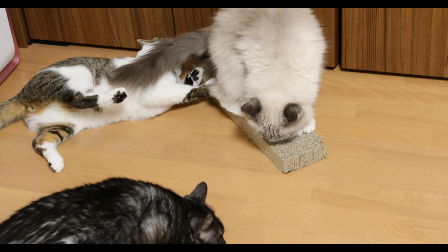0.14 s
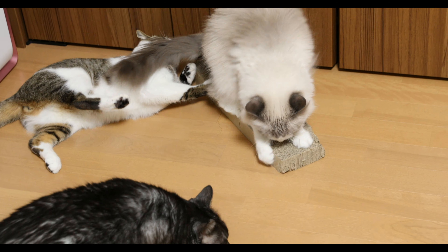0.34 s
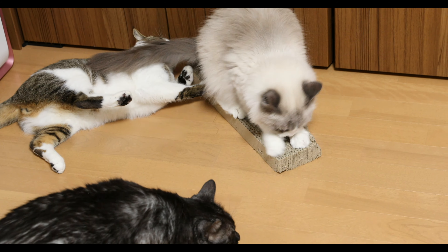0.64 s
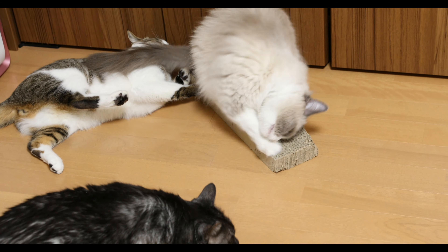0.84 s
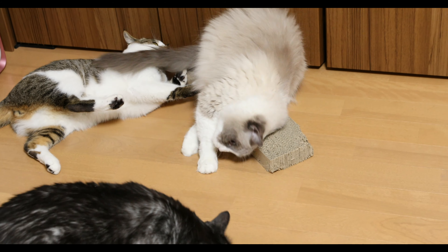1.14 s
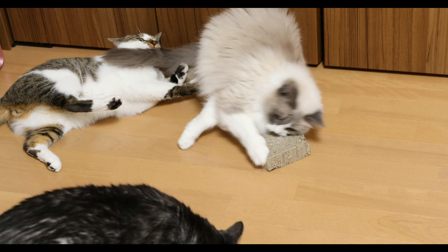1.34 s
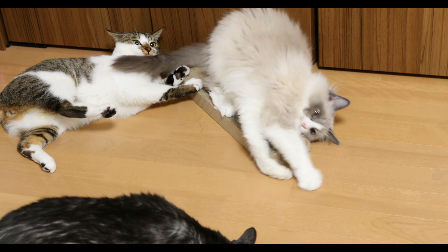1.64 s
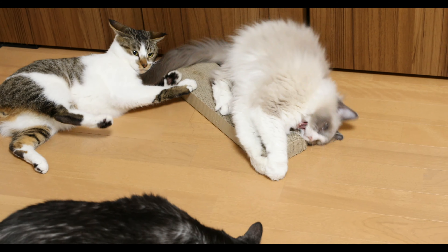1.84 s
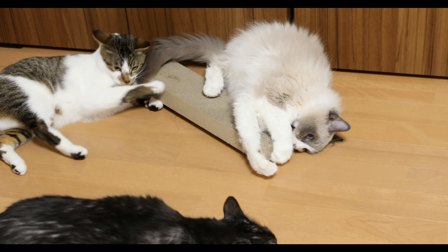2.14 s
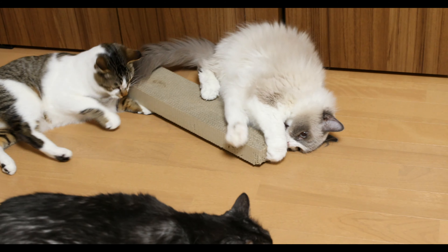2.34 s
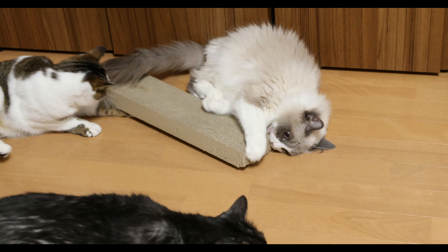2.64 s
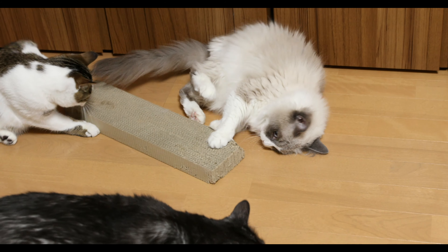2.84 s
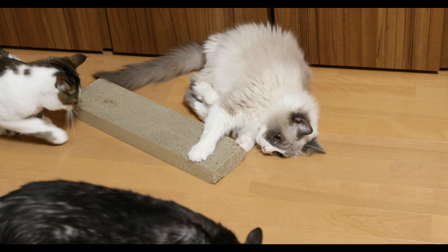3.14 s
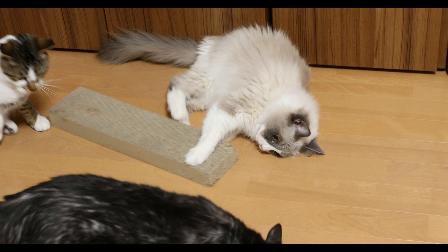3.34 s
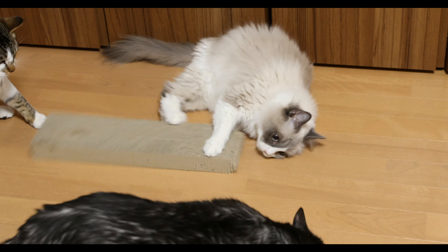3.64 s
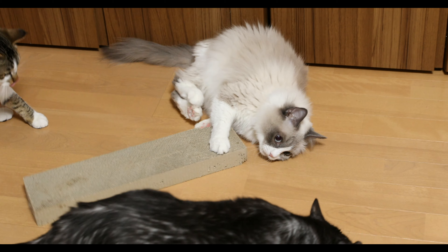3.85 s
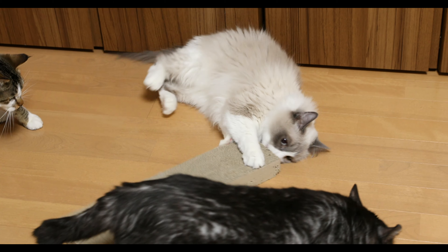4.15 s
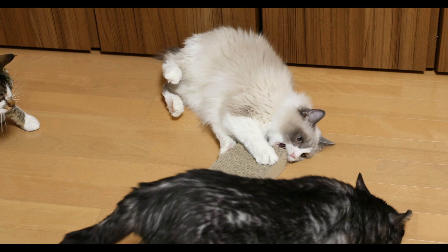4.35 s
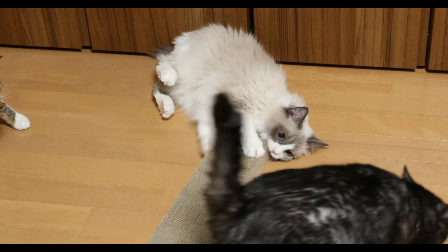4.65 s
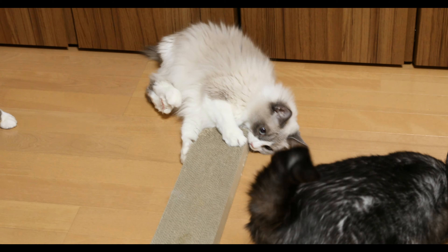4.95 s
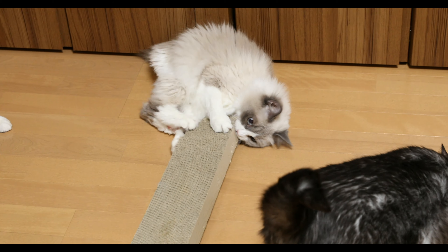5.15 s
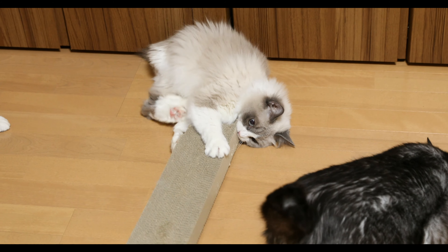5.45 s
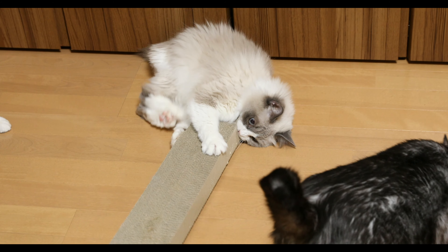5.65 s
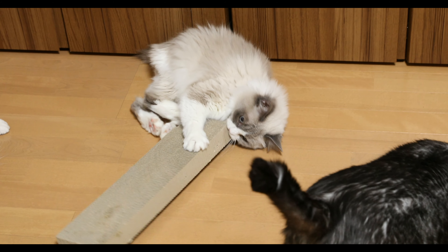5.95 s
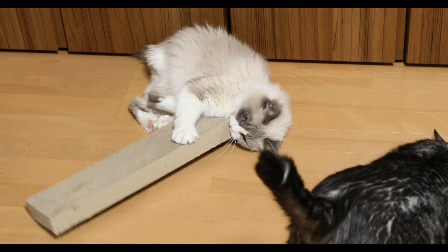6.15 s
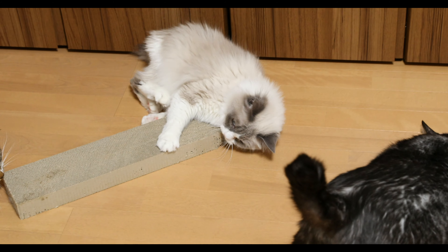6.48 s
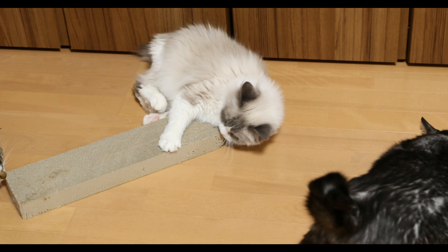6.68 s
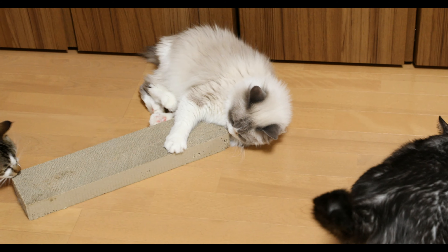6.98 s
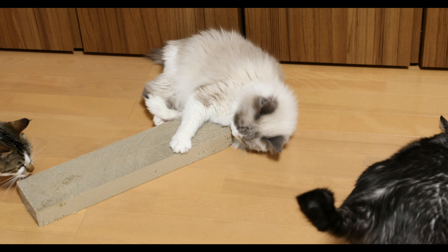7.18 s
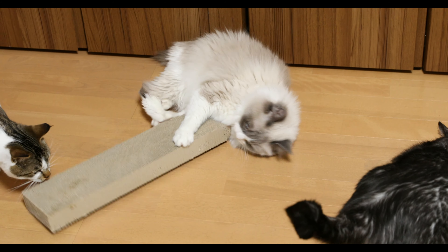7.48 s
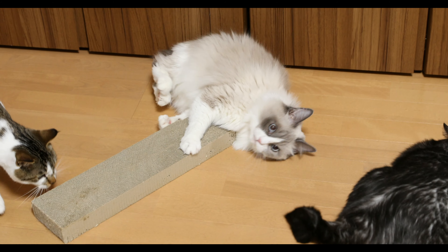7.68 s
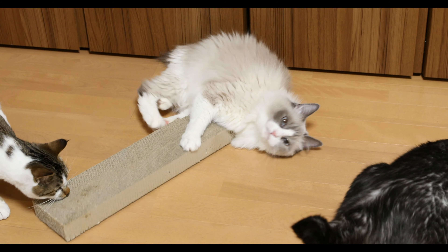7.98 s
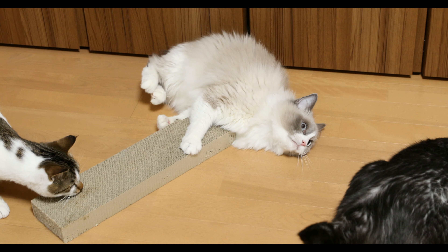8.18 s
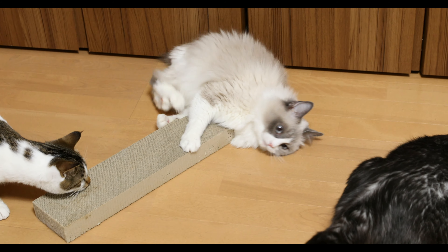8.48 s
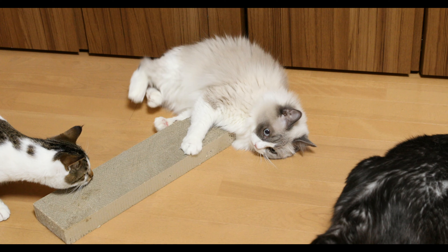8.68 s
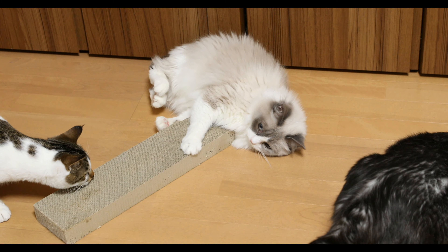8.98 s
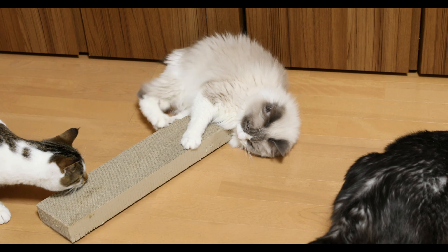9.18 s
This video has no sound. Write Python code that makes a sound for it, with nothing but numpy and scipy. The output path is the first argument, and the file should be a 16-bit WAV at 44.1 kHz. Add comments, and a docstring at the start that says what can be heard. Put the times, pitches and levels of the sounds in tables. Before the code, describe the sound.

In a bare, lively room with a steady low rush of air, a cat rubs and claws a corrugated cardboard scratcher. Crunchy clicks, short papery scrapes and soft body thumps come irregularly. The board claps flat on the wooden floor near three seconds, loudest past six, then again several times, more weakly at the end. Close stereo pickup, just left of centre, ducks after the loud slaps.

```python
"""A bare, lively room with a wooden floor, heard in stereo: a steady low rush of air (coloured noise) throughout.
From the first half second a cat works a corrugated cardboard scratcher just left of centre: catches and longer
rubs are stick-slip clicks through the cardboard, strokes hiss as friction grains, paws and body thump the floor.
At 2.8 s the board first slaps down flat, at 6.4 s loudest, and with four more slaps up to 9.3 s.
The camera's limiter ducks after the loudest slaps, so the room seems to swell behind them."""
import sys
import numpy as np
from scipy import signal
from scipy.fft import rfft, irfft
from scipy.io import wavfile

SR = 44100
rng = np.random.default_rng(int(sys.argv[2]) if len(sys.argv) > 2 else 0)


def unload_audio(sound):
    """Save the sound as a 16-bit wav file, at the path given as the first command line argument."""
    columns = np.transpose(np.atleast_2d(sound))
    # keep every value between -1 and 1, then stretch to whole-number steps
    steps = np.round(np.clip(columns, -1, 1) * 32767)
    wavfile.write(sys.argv[1], SR, steps.astype(np.int16))


N = 411012
TIME = np.arange(N) / SR  # s

# Steady air of the room: (frequency [Hz], relative level [dB])
AIR_COLOUR = [(15, -59), (30, -46), (55, -18), (100, -11.5), (170, -3), (330, -5), (520, -10.5),
              (900, -13.5), (1300, -21), (3000, -26.5), (7000, -34.5), (16000, -41)]
# Stereo width of the air: (frequency [Hz], side re mid [dB])
AIR_WIDTH = [(60, -10), (180, -14), (550, -8), (1650, -4.5), (5000, -4.5), (15000, 3.5)]
AIR_MID_DB = -45.5

# Strength of the room's ringing: (frequency [Hz], level [dB])
ROOM_COLOUR = [(60, -1.5), (200, 1.5), (600, -2), (2000, 0.5), (5000, -1), (12000, -3)]
# Time the room takes to die by 60 dB: (frequency [Hz], decay time [s])
ROOM_DECAY = [(100, 0.22), (400, 0.37), (1200, 0.44), (3500, 0.5), (7000, 0.47), (14000, 0.33)]
# Stereo width of the ringing: (frequency [Hz], side re mid [dB])
ROOM_WIDTH = [(80, -20), (250, -14), (600, -7.5), (1500, -6.5), (4500, -9), (10000, -1)]

# Strokes of paw and flank along the board:
# (start [s], length [s], paper hiss [dB], board ring [dB re paper hiss], fur hiss [dB re paper hiss])
STROKES = [(0.502, 0.02, -47.5, 1.5, -14), (0.543, 0.015, -43, -2.5, -21), (0.87, 0.024, -55.5, 4.5, -8),
           (1.241, 0.025, -53, -7, -10.5), (1.397, 0.017, -51, -1, -14), (1.472, 0.11, -53, 1, -13),
           (1.636, 0.24, -42.5, 1.5, -24), (1.97, 0.096, -47, 1.5, -15), (2.455, 0.044, -50.5, 3, -24),
           (2.72, 0.087, -47, -1, -19), (3.25, 0.11, -44.5, -3, -12), (3.49, 0.43, -46.5, -3, -10.5),
           (3.627, 0.11, -37.5, -1.5, -20), (4.025, 0.077, -40.5, -15, -15),
           (4.187, 0.16, -43.5, -4.5, -14), (4.607, 0.03, -46.5, 2, -17), (4.68, 0.35, -54, 1.5, -18),
           (5.042, 0.11, -47.5, -1, -6), (5.487, 0.03, -44.5, -1, -8.5), (5.636, 0.15, -43.5, -4.5, -2.5),
           (6.012, 0.35, -43.5, -3.5, -8), (7.147, 0.072, -46, 1.5, -19), (7.497, 0.031, -43, -3, -15),
           (8.554, 0.083, -53, 3, -20), (9.157, 0.12, -54, -1, -14)]
# The cat never lies quite still: floor under paper hiss, board ring and fur hiss [dB]
RESTING_DB = (-73, -74.5, -72)
SWELL_DB_PER_S, FADE_DB_PER_S = 140, 138  # a stroke leans in, holds, then lets go
# Thumps on the floor, mostly paws and body; the rows at 2.831 s and 8.048 s are the low thud under the board
# slaps there: (time [s], level [dB], hollow knock [dB re that level])
FOOTFALLS = [(.361, -33.5, -2.5), (0.891, -41.5, 7.5), (1.05, -24, -41), (1.083, -34, -23),
             (1.825, -20.5, -4.5), (1.853, -21, -0.5), (1.903, -24, -17), (2.22, -27.5, -0.5),
             (2.831, -17, -10), (3.153, -33, 5.5), (3.284, -30.5, -14), (3.367, -20, -6), (3.389, -21, -1),
             (3.7, -33, -17), (4.232, -40, 6), (4.375, -29, -8), (4.694, -27.5, -2), (4.729, -30.5, -2),
             (5.542, -35.5, -9), (5.98, -20.5, 2.5), (6.377, -26.5, -15), (6.403, -30.5, -0.5),
             (7.185, -26, -6), (8.048, -26, -15)]
# Longer rubs on the cardboard: (time [s], length [s], ring [dB], crunch [dB], tick [dB])
LONG_RUBS = [(1.621, 0.067, -58, -37.5, -58), (1.697, 0.017, -50, -29, -42),
             (2.812, 0.015, -32, -27.5, -42.5), (3.281, 0.072, -36.5, -40.5, -45),
             (3.641, 0.034, -25.5, -28, -40), (3.704, 0.032, -34, -54, -48),
             (5.975, 0.027, -37.5, -55, -39.5), (6.289, 0.03, -36.5, -43, -37),
             (7.454, 0.026, -41, -40, -56), (7.525, 0.05, -32, -44, -50), (7.954, 0.019, -15.5, -24.5, -48),
             (7.976, 0.075, -26, -35, -61), (9.24, 0.029, -39, -39.5, -69)]
# Claws and edges catch: (time [s], nominal ring peak [dB], crunch [dB re peak], tick [dB re peak])
CATCHES = [(0.352, -20.5, -20, -23), (0.366, -18.5, -10.5, -19.5), (0.704, -28, -25, -34),
           (0.744, -31, -20.5, -28), (0.868, -28, -19, -23.5), (1.006, -14, -6.5, -34),
           (1.598, -26, -13.5, -26), (1.672, -12.5, -8.5, -28), (2.024, -28, -22, -20),
           (2.222, -16.5, -23, -33), (2.674, -30.5, -22, -35), (3.156, -15.5, -24.5, -29),
           (3.254, -12.5, -18, -42), (3.349, -22.5, -11.5, -34), (3.632, -12.5, -23, -33),
           (4.026, -28, -8, -25), (4.759, -24, -27, -40), (5.043, -30.5, -21, -25),
           (5.131, -20.5, -23.5, -27), (5.205, -22.5, -23, -35), (5.402, -14, -16, -30),
           (5.574, -18.5, -21.5, -46.5), (5.811, -17.5, -22.5, -34), (6.112, -24, -14, -11),
           (6.184, -19, -20.5, -25), (6.2406, -7.5, -11.5, -31), (7.448, -10.5, -25.5, -42),
           (7.527, -16.5, -9, -24.5), (7.932, -8, -30, -45), (7.954, -7, -16, -47),
           (8.552, -24.5, -19, -38), (9.202, -14.5, -26.5, -45), (9.233, -17, -17.5, -45)]
RING_CREST_DB = 13  # how far the peak of a catch stands over its rms
# Deeper catches crunch duller: treble slope lost per dB over the usual
DULLING_DB_PER_OCTAVE, DULL_FROM_HZ, USUAL_CATCH_DB = 0.48, 3200, -19
# The board lands flat: (time [s], level [dB], treble tilt [dB per octave])
BOARD_SLAPS = [(2.828, 1, 2.5), (6.4342, 4, 7.5), (7.5753, -3, 3.5), (8.0420, -5.5, 1.5),
               (8.6190, -16, -11), (9.2858, -15.5, -9.5)]
SCUFF_ROOM_DB, SLAP_ROOM_DB = 3.5, -1.67  # how strongly each stirs the room, re its direct sound

# Ring of the board: (frequency [Hz], relative level [dB])
RING_COLOUR = [(150, -21), (500, -8.5), (680, -9), (850, 0), (1000, 2), (1400, -3.5), (1850, -5),
               (2500, -10), (5000, -52)]
# Crunch of the cardboard flutes: (frequency [Hz], relative level [dB])
CRUNCH_COLOUR = [(900, -37.5), (1700, 6), (2400, 12.5), (3700, 6.5), (5200, 5), (6500, -5.5), (8500, -21.5),
                 (14000, -79)]
# Ticks on the flute edges: (frequency [Hz], relative level [dB])
TICK_COLOUR = [(3500, -18), (6000, 1), (7500, 1), (10500, -6), (13000, -14), (16000, -22)]
# Hiss of the paper face: (frequency [Hz], relative level [dB])
PAPER_COLOUR = [(900, -0.5), (1800, -2), (3500, 1.5), (6500, 0.5), (9000, -7.5), (13000, -25)]
# Hiss of the fur: (frequency [Hz], relative level [dB])
FUR_COLOUR = [(4000, -20), (8000, -2), (11500, 0), (13500, -6), (16000, -11), (18000, -40)]
# Flat board on floor: (frequency [Hz], relative level [dB])
SLAP_COLOUR = [(40, -11), (80, -16), (150, -11.5), (230, 5.5), (400, 2), (650, 3), (1050, 2.5), (1600, -3),
               (3300, -16), (6000, -36.5), (14000, -83)]
# Soft weight on floor: (frequency [Hz], relative level [dB])
THUD_COLOUR = [(35, -67.5), (65, -8), (100, -7.5), (150, -4.5), (215, 3.5), (310, -5), (480, -2),
               (900, -34), (2000, -72.5)]
# Hollow knock of a bonier touch: (frequency [Hz], relative level [dB])
KNOCK_COLOUR = [(130, -25), (270, -9), (420, -3.5), (600, -2.5), (900, -12.5), (2000, -25.5), (5000, -51)]
# Broad ring of the board near 1 kHz, and narrow peaks of the room: (frequency [Hz], width [Hz], lift [dB])
BOARD_AND_ROOM_PEAKS = [(1016, 1100, 4), (1340, 73, 4), (1694, 11, 5)]
# Resonances of the floor: (frequency [Hz], width [Hz], lift [dB])
FLOOR_RESONANCES = [(101.8, 17, 12.2), (150, 8, 12.7), (299.5, 9.4, 3.6), (386.1, 13.8, 8.3),
                    (498, 27, 4.9), (993, 73, 4.8)]
CUTOFF_HZ = 16000


def from_db(db):
    """Decibels to gain."""
    return 10 ** (np.asarray(db) / 20)


def rms_one(x):
    """Scale to rms 1."""
    return x / np.sqrt(np.mean(x ** 2) + 1e-20)


def at_hz(points, hz):
    """Read a table on a log-frequency axis."""
    f, value = np.transpose(points)
    return np.interp(np.log(np.maximum(hz, 1)), np.log(f), value)


def add(track, s, sound):
    """Mix a sound into a track from time s on."""
    start = int(np.clip(round(s * SR), 0, N - 1))
    track[..., start:start + sound.shape[-1]] += sound[..., :N - start]


def coloured(x, spectrum, modes=(), tilt_db=0, tilt_from_hz=1100, size=8192):
    """Pass x through a causal (minimum-phase) filter with this colour, these peaks and a tilt per octave."""
    hz = np.arange(size // 2 + 1) * SR / size
    octaves_up = np.log2(np.maximum(hz / tilt_from_hz, 1))
    db = at_hz(spectrum, hz) + tilt_db * octaves_up
    for centre, width, lift in modes:
        db = db + lift / (1 + (2 * (hz - centre) / width) ** 2)
    # folding the cepstrum gives the minimum-phase response
    cepstrum = irfft(np.log(from_db(db)))[:size // 2]
    cepstrum[1:] *= 2
    response = irfft(np.exp(rfft(cepstrum, size)))
    response = np.array(response, ndmin=x.ndim)
    return signal.oaconvolve(x, response, axes=-1)[..., :x.shape[-1]]


def slips(count, per_s, spread_db):
    """Stick-slip: tiny clicks at random moments with uneven sizes; rms 1."""
    sizes = from_db(spread_db * np.minimum(rng.exponential(1, count), 4))
    signs = rng.choice([-1, 1], count)
    happens = rng.random(count) < per_s / SR
    return rms_one(sizes * signs * happens)


def contact(crumble_s, first_share, count=8000):
    """One touch: row 0, heard directly, a click and slips that swell and die; row 1, for the room, one click."""
    age = TIME[:count] / max(crumble_s, .0005)
    after = slips(count, 9000, 2.2) * np.sqrt(age) * np.exp(-age)
    click = signal.unit_impulse(count)
    direct = first_share * click + after / np.linalg.norm(after)
    return np.array([direct, click])  # the room would blur the slips, so it gets the click alone


def blow(sound, db):
    """Give each row of a short sound the energy of 10 ms at this level."""
    unit_energy = sound / np.linalg.norm(sound, axis=-1, keepdims=True)
    return from_db(db) * unit_energy * np.sqrt(SR / 100)


def air():
    """The steady low rush of the room: independent noise in mid and side."""
    mid, side = [rms_one(coloured(rng.standard_normal(N), AIR_COLOUR)) for channel in range(2)]
    side = coloured(side, AIR_WIDTH)
    return from_db(AIR_MID_DB) * np.array([mid + side, mid - side])


def room(x, count=26000):
    """Dense reflections build up within milliseconds and die band by band; the sides differ more in the treble."""
    t, hz = TIME[:count], np.arange(count // 2 + 1) * SR / count
    white = rfft(rng.standard_normal((2, count)))
    tails = np.zeros((2, count))  # mid, side
    edges = np.geomspace(40, 18000, 19)  # Hz
    for low, high in zip(edges, edges[1:]):
        centre = np.sqrt(low * high)
        band = irfft(white * ((hz >= low) & (hz < high)))
        band *= from_db(-60 * t / at_hz(ROOM_DECAY, centre))
        band *= 1 - np.exp(-(t / 0.00057) ** 2)  # build-up
        # energy in proportion to bandwidth
        band *= np.sqrt(2 * (high - low) / SR) / np.linalg.norm(band, axis=1, keepdims=True)
        side_db = np.array([[0], [at_hz(ROOM_WIDTH, centre)]])
        tails += band * from_db(at_hz(ROOM_COLOUR, centre) + side_db)
    mid, side = signal.oaconvolve(x[None], tails, axes=1)[:, :N]
    return np.array([mid + side, mid - side])


def grip(rate_hz, unsteady_db, step=64):
    """Friction grabs and lets go: a gain that wanders many times a second; rms 1."""
    slow = signal.butter(2, rate_hz, fs=SR / step, output="sos")
    wander = rms_one(signal.sosfilt(slow, rng.standard_normal(N // step + 1)))
    wander = np.interp(np.arange(N) / step, np.arange(len(wander)), wander)
    return rms_one(from_db(unsteady_db * wander))


def stroke_levels():
    """Each stroke swells, holds and fades; the strongest one sets the dB of paper, board and fur."""
    levels = np.outer(RESTING_DB, np.ones(N))
    for s, length, db, ring_db, fur_db in STROKES:
        swell_db = SWELL_DB_PER_S * (TIME - s)
        fade_db = FADE_DB_PER_S * (s + length - TIME)
        shape_db = np.minimum(0, np.minimum(swell_db, fade_db))
        levels = np.maximum(levels, db + shape_db + np.array([[0], [ring_db], [fur_db]]))
    return levels


def sliding():
    """Light, uneven friction: coarse grains in the board, fine ones on the paper, finest in the fur."""
    paper_db, ring_db, fur_db = stroke_levels()
    ring_grains = slips(N, 260, 2.7)
    ring = from_db(ring_db) * rms_one(coloured(ring_grains, RING_COLOUR, BOARD_AND_ROOM_PEAKS))
    paper = from_db(paper_db) * rms_one(coloured(slips(N, 2800, 1.8), PAPER_COLOUR))
    fur = from_db(fur_db) * rms_one(coloured(slips(N, 11000, 3.9), FUR_COLOUR))
    return (ring + paper) * grip(rate_hz=19, unsteady_db=3.0) + fur


def thumps(room_db=-2, tilt_per_knock=0.27, usual_knock_db=-12):
    """Soft weight sets the floor booming low; bonier touches boom higher and add a hollow knock."""
    out = np.zeros((2, N))  # direct sound, room feed
    for s, db, knock_db in FOOTFALLS:
        force = contact(0.012, first_share=0.43)
        tilt_db = tilt_per_knock * (knock_db - usual_knock_db)
        thud = coloured(force, THUD_COLOUR, FLOOR_RESONANCES, tilt_db, tilt_from_hz=74)
        knock = coloured(force, KNOCK_COLOUR, FLOOR_RESONANCES)
        sound = blow(thud, db) + blow(knock, db + knock_db)
        add(out, s, sound * from_db([[0], [room_db]]))
    return out


def long_rubs(count=8000):
    """A longer run of slips under brief pressure drives the ring, crunch and tick of the cardboard."""
    out, t = np.zeros(N), TIME[:count]
    for s, length, *levels in LONG_RUBS:
        press = np.clip(t / 0.0037, 0, 1)
        let_go = np.exp(-np.maximum(t - length, 0) / 0.0021)
        force = slips(count, 1500, 4.7)
        for colour, db in zip((RING_COLOUR, CRUNCH_COLOUR, TICK_COLOUR), levels):
            voice = rms_one(coloured(force, colour, BOARD_AND_ROOM_PEAKS))
            add(out, s, from_db(db) * press * let_go * voice)
    return out


def scuffs():
    """Each catch rings the board, crunches the flutes and ticks on their edges."""
    out = np.zeros((2, N))  # direct sound, room feed
    for s, db, crunch_db, tick_db in CATCHES:
        force = contact(0.003, first_share=0.15)
        ring = coloured(force, RING_COLOUR, BOARD_AND_ROOM_PEAKS)
        tilt_db = DULLING_DB_PER_OCTAVE * (USUAL_CATCH_DB - db)
        crunch = coloured(force, CRUNCH_COLOUR, tilt_db=tilt_db, tilt_from_hz=DULL_FROM_HZ)
        tick = coloured(force, TICK_COLOUR)
        sound = blow(ring, db - RING_CREST_DB)
        sound += blow(crunch, db + crunch_db)
        sound += blow(tick, db + tick_db)
        add(out, s, sound)
    return out * from_db([[0], [SCUFF_ROOM_DB]])


def slaps():
    """The flat side claps on the floor and rattles for a few milliseconds."""
    out = np.zeros((2, N))  # direct sound, room feed
    for s, db, tilt_db in BOARD_SLAPS:
        force = contact(0.0039, first_share=0.59)
        add(out, s, blow(coloured(force, SLAP_COLOUR, FLOOR_RESONANCES, tilt_db), db))
    return out * from_db([[0], [SLAP_ROOM_DB]])


def scene(left_db=0.22):
    """Just left of centre; the clap of the board's far end and everything else (paws, rubs, the low thud under
    two slaps) each stir the room from a spot of their own."""
    far_end = slaps()
    paws = scuffs() + long_rubs() + thumps() + sliding()
    direct = (far_end[0] + paws[0]) * from_db([[left_db], [-left_db]])
    return direct + room(far_end[1]) + room(paws[1]) + air()


def limiter(x, threshold_db=0.5, release_db_per_s=110, attack_s=0.0017):
    """Peaks over the threshold pull the gain down fast; it climbs back steadily."""
    loudest_db = 20 * np.log10(np.abs(x).max(axis=0) + 1e-9)  # louder channel rules both
    over = np.maximum(loudest_db - threshold_db, 0)
    release = release_db_per_s * TIME
    held = np.maximum.accumulate(over + release) - release
    pole = np.exp(-1 / (attack_s * SR))
    return x * from_db(-signal.lfilter([1 - pole], [1, -pole], held))


def record(dry):
    """The limiter is too slow for the first crest of a slap, which clips; the top is cut."""
    clipped = np.clip(limiter(dry), -.95, .95)
    top_cut = signal.ellip(12, .1, 80, CUTOFF_HZ, fs=SR, output="sos")
    return signal.sosfilt(top_cut, clipped)


dry = scene()
out = record(dry)
unload_audio(out)
```